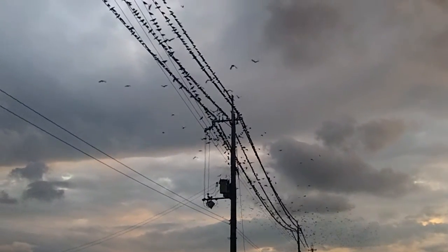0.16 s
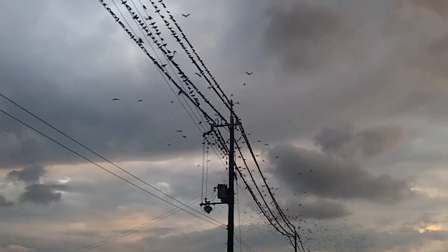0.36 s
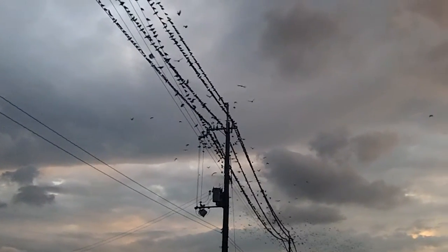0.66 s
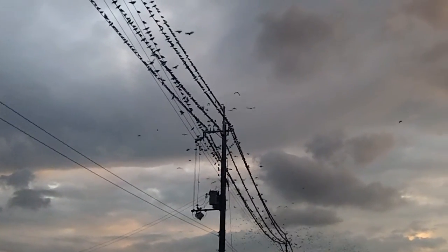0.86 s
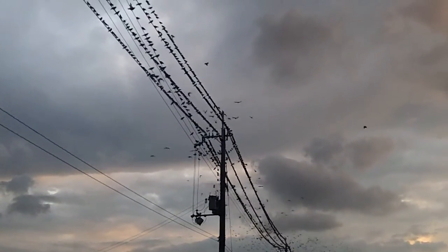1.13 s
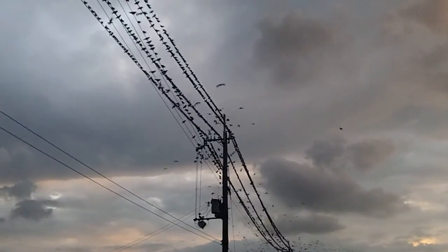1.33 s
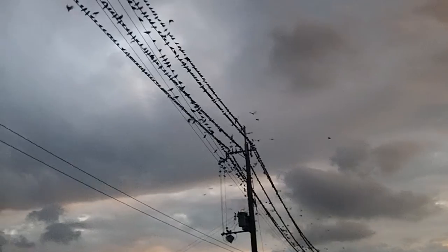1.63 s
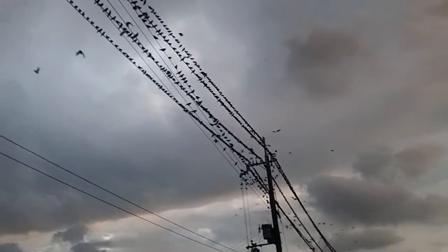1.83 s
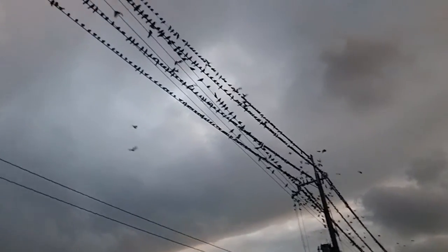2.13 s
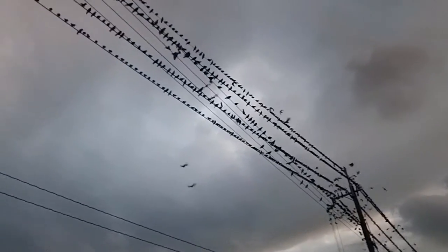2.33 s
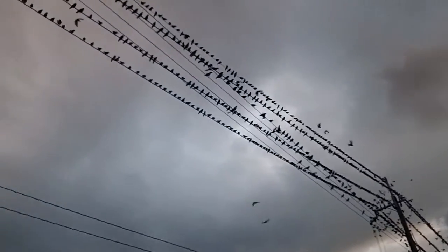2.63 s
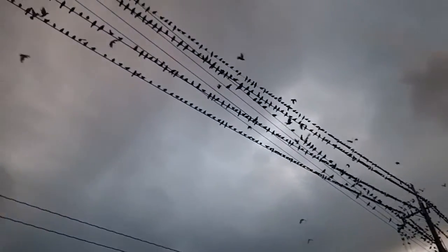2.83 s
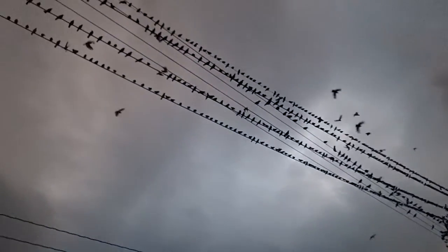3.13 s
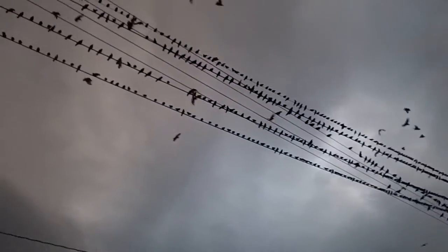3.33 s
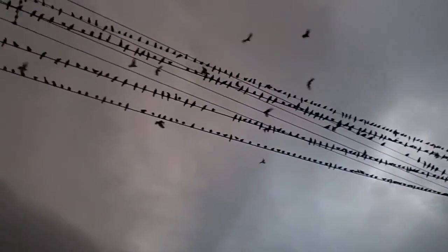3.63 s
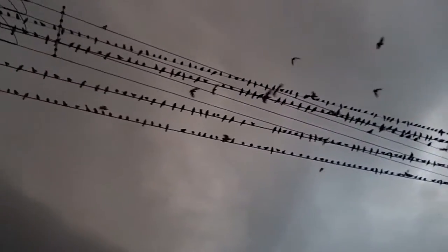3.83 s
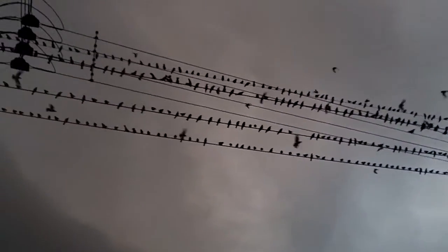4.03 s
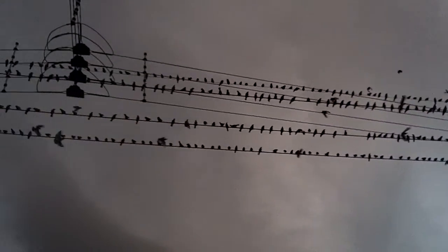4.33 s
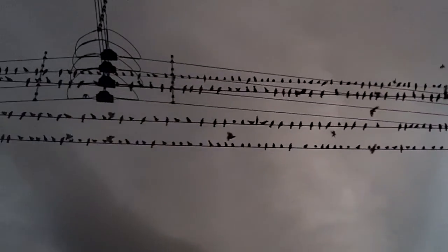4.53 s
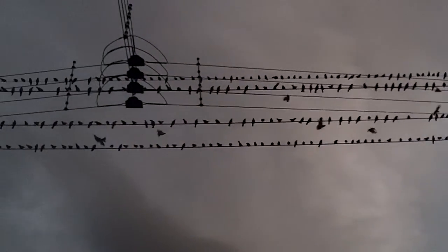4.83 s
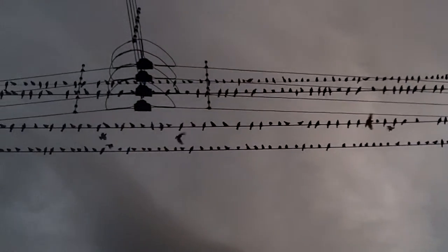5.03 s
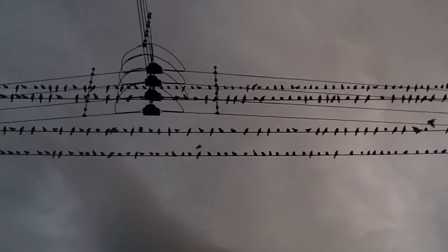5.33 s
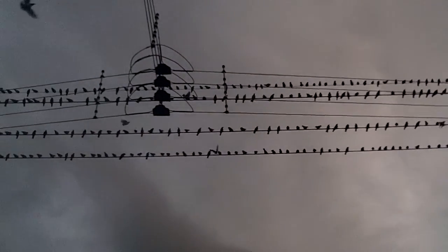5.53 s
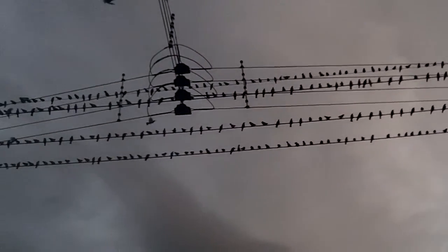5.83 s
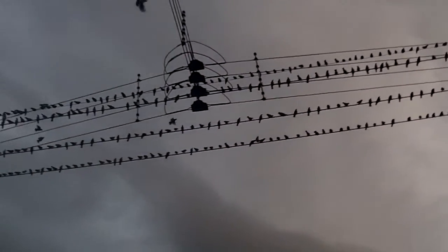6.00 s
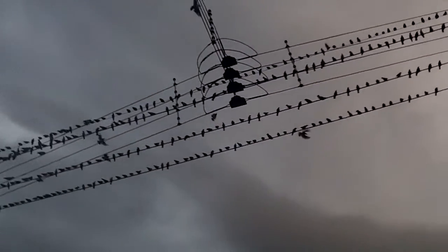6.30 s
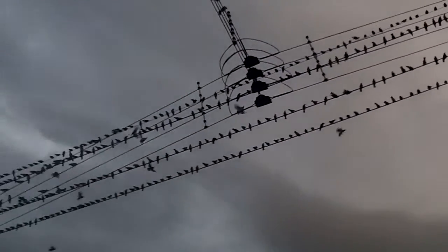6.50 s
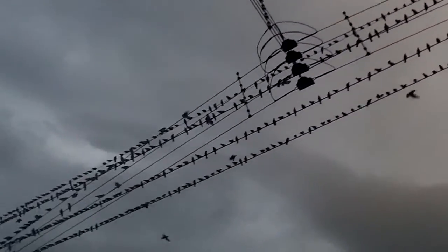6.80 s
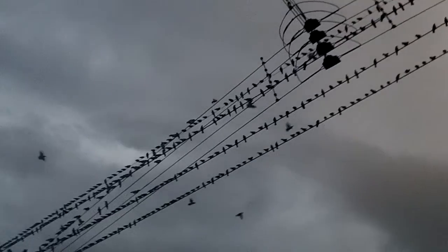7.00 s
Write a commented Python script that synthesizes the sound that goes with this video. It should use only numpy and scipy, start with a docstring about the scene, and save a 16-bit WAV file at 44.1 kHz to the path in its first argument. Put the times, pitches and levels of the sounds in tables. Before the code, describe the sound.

A huge flock of small birds chatters from power lines overhead, hundreds of chirps, trills and whistles blending into a steady, bright din. Sharp bill clicks and a few closer squeals poke through, and one bird rustles softly past about three seconds in. Far beneath the birds, a distant engine idles and a road rumbles faintly. Light wind and a few soft handling bumps touch the outdoor microphone.

```python
"""A huge flock of starlings chatters on power lines under an evening sky.
Each call is a tone that slides, pulses and wavers. Hundreds of chirps, whistles and trills a
second run together with clicking bills, and the far birds melt into a bright wash of noise.
One bird rustles past. Below it all an engine hums at idle some way off, a far road rumbles,
and light wind and a hand bump the microphone."""
import sys
import numpy as np
from scipy import signal
from scipy.fft import rfft, irfft, next_fast_len
from scipy.io import wavfile
from scipy.ndimage import uniform_filter1d

SR = 44100
rng = np.random.default_rng(int(sys.argv[2]) if len(sys.argv) > 2 else 0)


def transcribe(u):
    """Save the signal u as a 16-bit wav file named by the first command-line argument.

    u: samples, shape (n,) or (channels, n), limited to [-1, 1]; the rate is SR.
    q: integer samples, one column per channel.
    """
    v = np.clip(np.atleast_2d(u).T, -1, 1)
    q = np.round(v * 32767).astype(np.int16)
    wavfile.write(sys.argv[1], SR, q)


N = 315756

# How the voices spread over pitch. Each row: pitch in Hz, relative strength in dB.
VOICE_SPECTRUM = [(700, -38.5), (1250, -22), (1600, -15), (2000, -7), (2550, -2.5), (3000, -2),
                  (3350, -0.5), (3900, -1.2), (4300, -1.74), (4600, -3), (5100, -5.5), (6000, -10.5),
                  (6900, -20), (7700, -45), (9000, -112)]
# The flock's nearly steady din. Each row: time in seconds, gain in dB.
DIN_LEVEL = [(0, -24.5), (1.45, -25), (1.68, -24), (2.1, -24), (2.45, -24), (2.9, -24), (3.9, -25),
             (4.35, -24.5), (4.62, -25.5), (4.95, -24.5), (6.3, -24), (7.16, -24)]
# Voices above 5 kHz. Each row: time in seconds, boost in dB.
SHRILL_BOOST = [(0, 1.5), (1.1, 1.3), (1.9, 0.2), (2.2, -1.3), (4.2, -1.5), (4.42, 1), (4.62, -1.5),
                (5.0, 0.5), (7.16, -0.5)]
# Voices below 3 kHz. Each row: time in seconds, boost in dB.
LOW_BOOST = [(0, 0.5), (1.7, -0.1), (3.0, -1.3), (3.9, -0.4), (4.5, -1), (4.85, 0), (7.16, -1.5)]
# The hissing top of the calls. Each row: frequency in Hz, relative strength in dB.
SIZZLE_SPECTRUM = [(5000, -13), (7300, 6.5), (7900, -22), (8400, 5.5), (9200, 6), (9900, -8), (12400, -3),
                   (13200, -12), (14200, -30)]
# Harsh rasps lift that hiss. Each row: middle and length in seconds, boost in dB.
RASPS = [(.28, .14, 3.5), (.63, 0.16, 5), (1.95, 0.14, 1), (4.46, 0.32, 1), (5.18, 0.11, 3),
         (5.63, 0.36, 2), (6.25, .12, 0)]
# The whistling swells. Each row: middle and length in seconds, boost in dB.
WHISTLE_BOUTS = [(3.93, 3.1, 9.5)]
# Close birds. Each row: start and length in seconds, pitch in Hz, slide in octaves, level in dB.
NEAR_CALLS = [(0.065, 0.1, 6320, -0.028, -36), (1.13, .13, 6280, 0.17, -39),
              (2.461, 0.021, 3780, 0.05, -21), (3.584, 0.0097, 3820, -0.17, -21),
              (3.61, 0.015, 3900, -0.18, -23), (4.365, 0.11, 5300, -0.064, -29.5),
              (4.087, 0.11, 4020, 0.058, -30), (4.48, 0.056, 3950, 0.02, -28),
              (4.951, 0.0055, 4010, -.1, -16), (5.268, 0.11, 5230, 0.098, -31.5),
              (5.53, 0.13, 5500, -0.2, -38), (5.943, 0.025, 3740, -0.32, -25),
              (6.076, 0.049, 3420, .1, -23), (6.19, 0.15, 5370, 0.13, -36), (6.49, .1, 5460, -0.056, -35)]
# A bird flies past. Each row: middle and length in seconds, level in dB.
FLUTTERS = [(3.145, .2, -47), (3.265, 0.15, -57)]
# Its rustling feathers. Each row: frequency in Hz, relative strength in dB.
FEATHER_SPECTRUM = [(3000, -10), (6500, 10), (9000, 0), (10200, -8), (12600, -1), (13400, -11),
                    (14200, -28)]
# The engine sags and picks up again. Each row: time in seconds, firings per second.
ENGINE_SPEED = [(0, 119.7), (1.4, 117.8), (2.6, 115.6), (4.1, 115.4), (4.8, 117.1), (7.16, 118.7)]
# The engine's loudness. Each row: time in seconds, level in dB.
ENGINE_LEVEL = [(0, -47.5), (1.3, -46.5), (2.1, -51), (4.0, -52.5), (4.9, -55.5), (5.9, -53), (7.16, -54.5)]
# The engine's tones. Each row: multiple of the firing rate, boost in dB.
ENGINE_TONES = [(1, 1.5), (1.5, -11), (2.5, -17.5)]
# Wind on the microphone. Each row: frequency in Hz, relative strength in dB.
WIND_SPECTRUM = [(15, -7), (40, 4.5), (75, -1.5), (105, -1.5), (170, -19), (300, -18), (600, -36)]
# Gusts. Each row: middle and length in seconds, boost in dB.
GUSTS = [(.36, 1.4, 9), (1.3, 3, 6.5), (2.1, 0.42, 4), (3.1, 1.5, 4), (4.55, 1.5, 3.5)]
# Knocks of the hand. Each row: start in seconds, gain in dB, final pitch in Hz, decay in seconds.
BUMPS = [(0.233, -34, 80.4, 0.0076), (0.403, -31, 45, 0.011), (1.592, -30, 32, 0.015),
         (1.959, -29, 85, 0.0078), (1.979, -35, 48, 0.025), (2.034, -34, 48, .012), (2.225, -35, 34, .018),
         (4.254, -31, 42, .008), (4.387, -31.5, 30, 0.016), (4.496, -35, 35, 0.0099),
         (5.286, -39, 130, 0.0086), (6.106, -37, 26, .016), (6.468, -40, 247, 0.0073)]
# Far traffic. Each row: frequency in Hz, relative strength in dB.
ROAD_SPECTRUM = [(60, 3), (140, 11), (200, 3), (300, 11.5), (400, -1.5), (510, 2.5), (650, -0.5), (820, -1),
                 (1020, 4.5), (1300, -0.5), (2500, -13)]
# The traffic recedes. Each row: time in seconds, level in dB.
ROAD_LEVEL = [(0, -48), (1.1, -48.5), (1.5, -50.5), (4.5, -50.5), (7.16, -52)]
# The tyres sing louder. Each row: middle and length in seconds, boost in dB.
WHINE_SWELLS = [(6.06, .25, 5), (6.75, .3, 6), (7.08, 0.18, 4)]
# The road's hum swells. Each row: middle and length in seconds, boost in dB.
DRONE_SWELL = [(4.4, 3.6, 10)]


def flock():
    """Chips, chirps and trills from the wires overhead, in front of the wash of the far birds."""
    chips = chorus(count=1100, focus=2.354, length_s=0.011, glide_octaves=0.26,
                   pulse_hz=62, pulsing=0.24, rasp_hz=61, spread_db=3)
    chirps = chorus(count=1000, focus=1.7, length_s=0.055, glide_octaves=0.29,
                    pulse_hz=90.5, pulsing=0.45, rasp_hz=90, spread_db=1.5)
    trills = chorus(count=1050, focus=2.3, length_s=0.09, glide_octaves=0.1478,
                    pulse_hz=35.08, pulsing=4.3, rasp_hz=198.3, spread_db=0)
    overhead = unit_level(from_db(-2) * chips + from_db(-4.5) * chirps + trills)
    far_birds = noise(VOICE_SPECTRUM) * from_db(0.5 * drift(90))
    din = from_db(-4) * overhead + from_db(-1.79) * far_birds
    # the low and the shrill voices come and go around a steady middle
    body, low = keep_below(din, hz=5000), keep_below(din, hz=3000)
    middle = body - low
    shrill = from_db(1.7 * drift(7.4)) * (din - body)
    voices = from_db(curve(LOW_BOOST)) * low + middle + from_db(curve(SHRILL_BOOST)) * shrill
    clicks = from_db(-11) * bill_clicks()
    return from_db(curve(DIN_LEVEL)) * (voices + sizzle(shrill)) + clicks


def chorus(count, focus, length_s, glide_octaves, pulse_hz, pulsing, rasp_hz, spread_db):
    """Birds call one after another, each with its own pitch, pace, distance and ground echo."""
    echo_db, longest_echo_s = -9, 0.09
    out, draws = np.zeros(N), rng.random((count, 6))
    pitches = voice_pitches(count, focus)
    strength_db = 0.74 * at_hz(VOICE_SPECTRUM, pitches)   # voices weaken at the ends of their range
    for turn, (when, span, bend, pace, far, late) in enumerate(draws):
        note_s = length_s * 2 ** (span - 0.5)
        glide = glide_octaves * (2 * bend - 1.2)
        note = call(note_s, pitches[turn], glide, pulse_hz * 2 ** ((pace - 0.5) / 2), pulsing, rasp_hz)
        start_s = (turn + 2 * when) / count * (N / SR + 2 * length_s) - 2 * length_s
        level_db = strength_db[turn] - spread_db * far
        add(out, start_s, from_db(level_db) * note)
        add(out, start_s + longest_echo_s * late, from_db(level_db + echo_db) * note)
    return unit_level(out)


def call(length_s, hz, glide_octaves, pulse_hz, pulsing, rasp_hz, warble_octaves=0.04):
    """One note from a bird's voice box: it slides, wavers and beats in pulses that bend its pitch."""
    size = int(length_s * SR)
    progress = np.arange(size) / size
    beat = np.cos(2 * np.pi * (pulse_hz * length_s * progress + rng.random()))
    waver = np.interp(progress * length_s * 900, np.arange(400), rng.standard_normal(400))
    pitch = hz * 2 ** (glide_octaves * (progress - 0.5) + warble_octaves * beat) + rasp_hz * waver
    swell = np.sqrt(4 * progress * (1 - progress))
    pulses = np.maximum(1 + pulsing * beat, 0) ** 2   # pulsing above 1 chops the note into a trill
    return swell * unit_level(pulses) * np.sin(2 * np.pi * np.cumsum(pitch) / SR)


def voice_pitches(count, focus):
    """Random pitches in Hz; a higher focus crowds them where the flock is loudest."""
    hz = np.arange(2000, 6200, 10)
    share = np.cumsum(from_db(focus * at_hz(VOICE_SPECTRUM, hz)) ** 2)
    return np.interp(even_draws(count, size=9), share / share[-1], hz)


def bill_clicks(per_second=14, hz=3770, width_s=0.00046, spread_db=21):
    """Snapping bills: tiny bursts of a few waves, uneven in pitch and strength."""
    out, t = np.zeros(N), np.arange(-60, 61) / SR
    for when, pitch, far in rng.random((int(per_second * N / SR), 3)):
        snap_hz = hz * 2 ** ((pitch - 0.5) / 2)
        snap = np.exp(-(t / width_s) ** 2) * np.cos(2 * np.pi * snap_hz * t)
        add(out, when * N / SR, from_db(-spread_db * far) * snap)
    return out


def sizzle(voices, smoothing_s=0.01, fade_db_per_s=0.3):
    """The hissing top of the calls keeps step with the voices and flares in harsh rasps."""
    loudness = unit_level(uniform_filter1d(np.abs(voices), int(smoothing_s * SR)))
    level_db = -30 - fade_db_per_s * np.arange(N) / SR + swells(RASPS)
    flicker_db = 1.4 * drift(25)
    return from_db(level_db + flicker_db) * loudness ** 0.34 * noise(SIZZLE_SPECTRUM)


def tweets(per_second=80, length_s=0.008, middle_hz=4092, spread_octaves=0.419):
    """The nearer birds throw in very short, clean notes that sweep up or down."""
    out, count = np.zeros(N), int(per_second * N / SR)
    pitches = middle_hz * 2 ** (spread_octaves * (even_draws(count, size=4) - 0.5))
    for turn, (when, bend, span, far) in enumerate(rng.random((count, 4))):
        note = call(length_s * 2 ** (span - 0.5), pitches[turn], glide_octaves=0.17 * (2 * bend - 1.2),
                    pulse_hz=61, pulsing=0.25, rasp_hz=30, warble_octaves=0.0082)
        add(out, (turn + 2 * when) / per_second, from_db(-25.5 - 7 * far) * note)
    return out


def whistles(per_second=120, length_s=0.0303, middle_hz=3878, spread_octaves=0.151):
    """A knot of birds takes turns on nearly one pitch, with clear notes that ring together."""
    out, count = np.zeros(N), int(per_second * N / SR)
    for turn, (when, pitch, bend, span, far) in enumerate(rng.random((count, 5))):
        hz = middle_hz * 2 ** (spread_octaves * (pitch - 0.5))
        note = call(length_s * 2 ** (span - 0.5), hz, glide_octaves=0.1 * (bend - 0.5),
                    pulse_hz=40, pulsing=0.21, rasp_hz=35.4, warble_octaves=0.01)
        add(out, (turn + when) / per_second, from_db(-4 * far) * note)
    return from_db(-40.5 + swells(WHISTLE_BOUTS)) * unit_level(out)


def near_birds():
    """Harsh squeals from the closest perches."""
    out = np.zeros(N)
    for start_s, length_s, hz, glide, level_db in NEAR_CALLS:
        squeal = call(length_s, hz, glide, pulse_hz=67.5, pulsing=0.096, rasp_hz=254)
        add(out, start_s, from_db(level_db) * squeal)
    return out


def wings(beats_per_second=15):
    """Feathers brush the air: a bright rustle that pulses with the wingbeat."""
    passing = swells([(middle_s, length_s, from_db(db)) for middle_s, length_s, db in FLUTTERS])
    wingbeat_db = 1.5 * np.cos(2 * np.pi * beats_per_second * np.arange(N) / SR)
    return passing * from_db(wingbeat_db) * noise(FEATHER_SPECTRUM)


def engine():
    """An idling engine's firings make low tones; its turning crank hums an octave below them."""
    firing_hz = curve(ENGINE_SPEED) * (1 + 0.0028 * drift(3.5))
    phase = 2 * np.pi * np.cumsum(firing_hz) / SR
    level_db = curve(ENGINE_LEVEL)
    tones = sum(from_db(level_db + boost_db + 0.7 * drift(0.79)) * np.sin(multiple * phase)
                for multiple, boost_db in ENGINE_TONES)
    crank = from_db(-53.5 + 0.7 * drift(3.7)) * np.sin(phase / 2)
    return np.sqrt(2) * (tones + crank)


def wind(breeze_db=-54):
    """Light wind rumbles on the microphone and rises in gusts."""
    return from_db(breeze_db + swells(GUSTS)) * noise(WIND_SPECTRUM)


def hand_bumps(sag_s=0.0057, attack_s=0.00069):
    """A hand knocks softly on the microphone; each thud sinks in pitch as it dies."""
    out, t = np.zeros(N), np.arange(SR // 5) / SR
    for start_s, gain_db, hz, decay_s in BUMPS:
        pitch = hz * (1 + 2.02 * np.exp(-t / sag_s))
        loudness = from_db(gain_db) * (1 - np.exp(-t / attack_s)) * np.exp(-t / decay_s)
        add(out, start_s, loudness * np.sin(2 * np.pi * np.cumsum(pitch) / SR))
    return out


def road():
    """Far traffic blurs into an uneven rumble that slowly recedes."""
    return from_db(curve(ROAD_LEVEL) + 1.2 * drift(5.2)) * noise(ROAD_SPECTRUM)


def tyre_whine(start_s=5.85, rise_s=0.15):
    """Far tyres begin to sing: a thin, smeared tone that comes and goes."""
    fade_in = np.clip((np.arange(N) / SR - start_s) / rise_s, 0, 1)
    return from_db(-63 + swells(WHINE_SWELLS)) * fade_in * band_noise(hz=784, width_hz=36)


def road_drone():
    """A thin hum from the road that swells and fades."""
    return from_db(-71 + swells(DRONE_SWELL)) * band_noise(hz=233, width_hz=5.3)


def from_db(db):
    """Turn decibels into a number to multiply by."""
    return 10 ** (np.asarray(db) / 20)


def unit_level(x):
    """Scale a signal to an average (rms) level of 1."""
    return x / np.sqrt(np.mean(x ** 2) + 1e-20)


def curve(rows):
    """Join (time, value) rows with straight lines, one value per sample."""
    return np.interp(np.arange(N) / SR, *np.transpose(rows))


def swells(rows):
    """Each row rises and falls as one smooth arch."""
    t = np.arange(N) / SR
    return sum(height * np.cos(np.pi * np.clip((t - middle_s) / length_s, -0.5, 0.5)) ** 2
               for middle_s, length_s, height in rows)


def at_hz(spectrum, hz):
    """A spectrum's strength in dB at the given frequencies."""
    points_hz, points_db = np.transpose(spectrum)
    return np.interp(np.log(hz + 1e-9), np.log(points_hz), points_db)


def add(out, start_s, sound):
    """Mix a sound in; what falls outside is dropped."""
    start = int(start_s * SR)
    first, last = max(start, 0), min(start + len(sound), N)
    if last > first:
        out[first:last] += sound[first - start:last - start]


def even_draws(count, size):
    """Random numbers from 0 to 1; every round of `size` draws covers the whole range."""
    order, within = rng.random((count // size + 1, 2, size)).transpose(1, 0, 2)
    return ((np.argsort(order, axis=1) + within) / size).ravel()[:count]


def drift(rate):
    """A smooth random wobble of about size 1, with roughly `rate` turns a second."""
    memory = np.exp(-80 * np.pi * rate / SR)
    kicks = rng.standard_normal(N // 40 + 2002)   # one for every 40 samples
    slow = signal.lfilter([1], [1, -2 * memory, memory * memory], kicks)[2000:]
    return np.interp(np.arange(N) / 40, np.arange(len(slow)), unit_level(slow))


def noise(spectrum):
    """Steady noise shaped by a spectrum, dying away above its last row."""
    size = next_fast_len(N)
    hz = np.fft.rfftfreq(size, 1 / SR)
    gain = from_db(at_hz(spectrum, hz)) / np.maximum(hz / spectrum[-1][0], 1) ** 3
    return unit_level(irfft(rfft(rng.standard_normal(size)) * gain, size)[:N])


def band_noise(hz, width_hz):
    """Noise in a band so narrow that it has a pitch."""
    band = signal.butter(1, [hz - width_hz / 2, hz + width_hz / 2], "band", fs=SR, output="sos")
    return unit_level(signal.sosfilt(band, rng.standard_normal(N)))


def keep_below(sound, hz):
    """Filter away what lies above a frequency."""
    return signal.sosfiltfilt(signal.butter(4, hz, fs=SR, output="sos"), sound)


def scene():
    """The birds and their background, mixed into one channel."""
    birds = flock() + tweets() + whistles() + near_birds() + wings()
    background = engine() + wind() + hand_bumps() + road() + tyre_whine() + road_drone()
    return (birds + background)[None]


def record(dry):
    """Fade both ends quickly and cut the highest treble steeply."""
    fade_s, cutoff_hz = 0.003, 14100
    samples_from_edge = np.minimum(np.arange(N), np.arange(N)[::-1])
    fade = np.minimum(samples_from_edge / (fade_s * SR), 1)
    return signal.sosfilt(signal.ellip(10, 0.1, 80, cutoff_hz, fs=SR, output="sos"), dry * fade)


dry = scene()
out = record(dry)
transcribe(out)
```